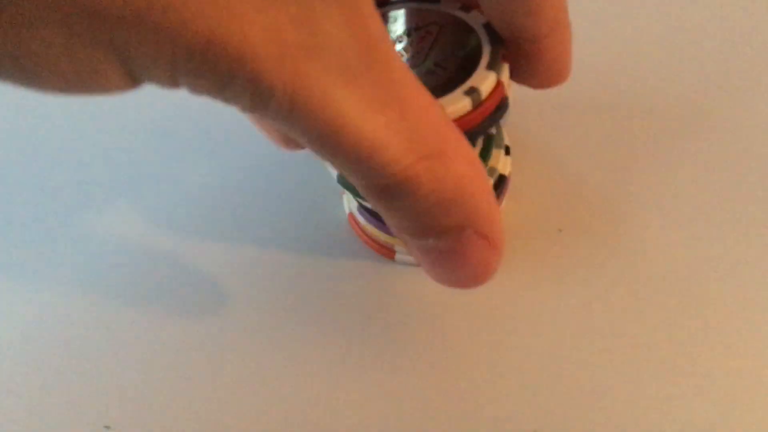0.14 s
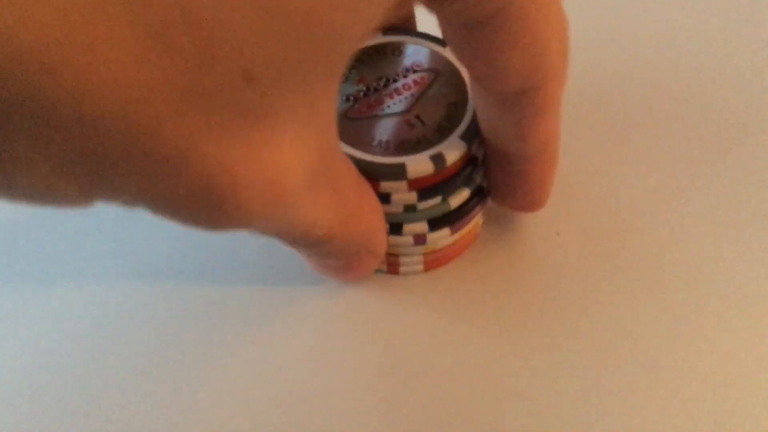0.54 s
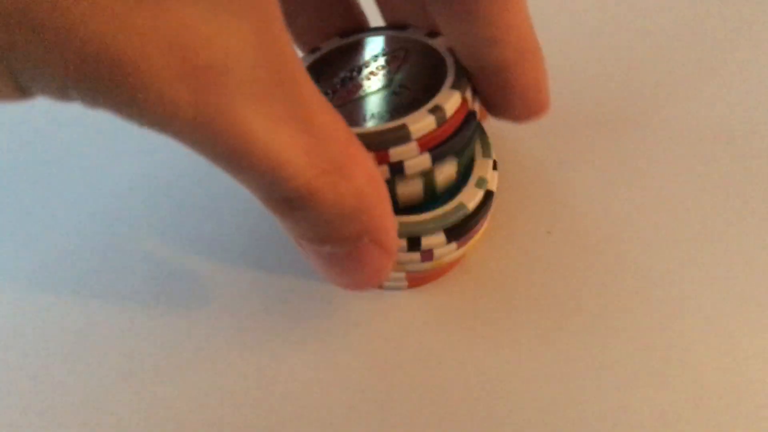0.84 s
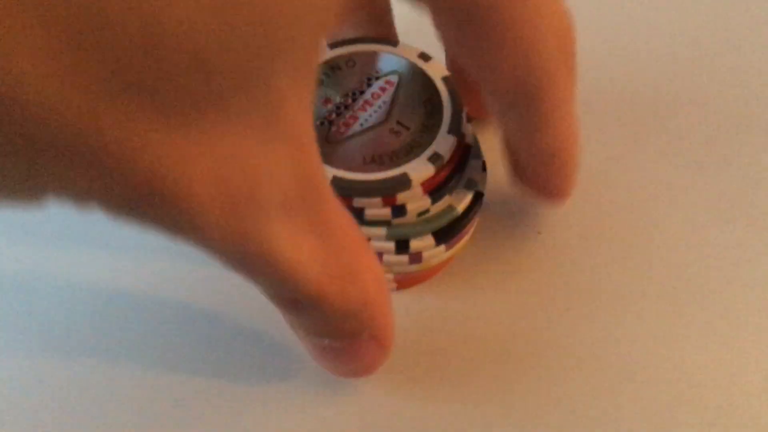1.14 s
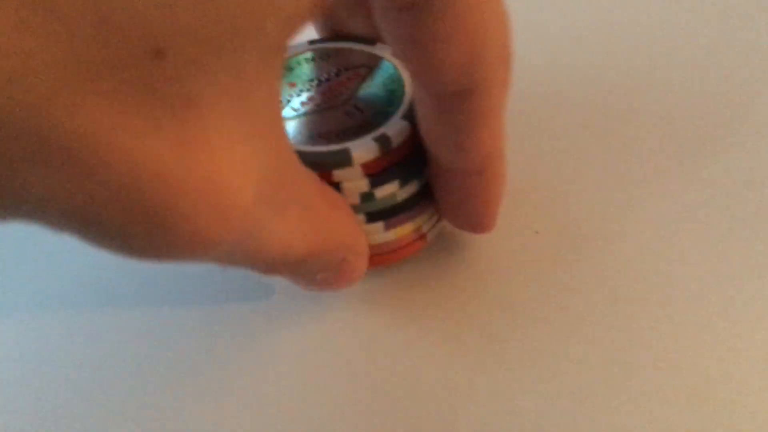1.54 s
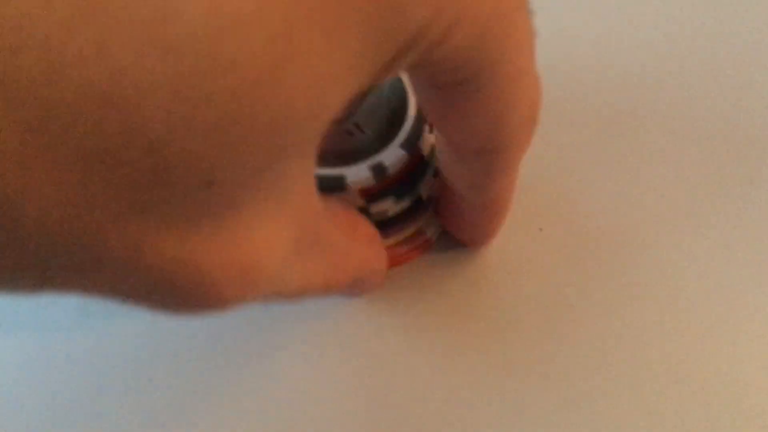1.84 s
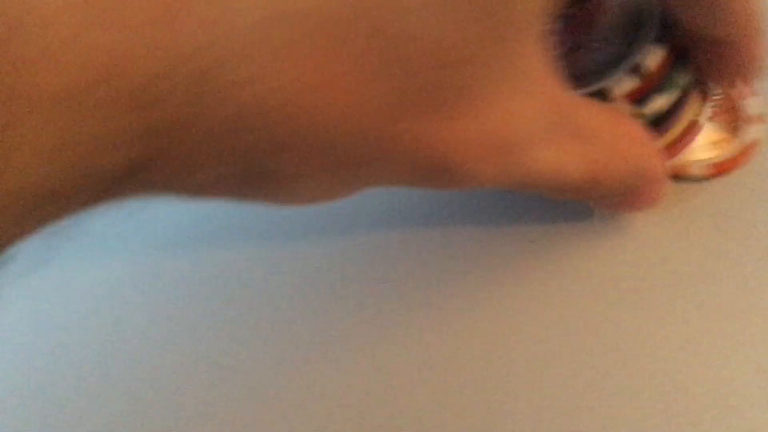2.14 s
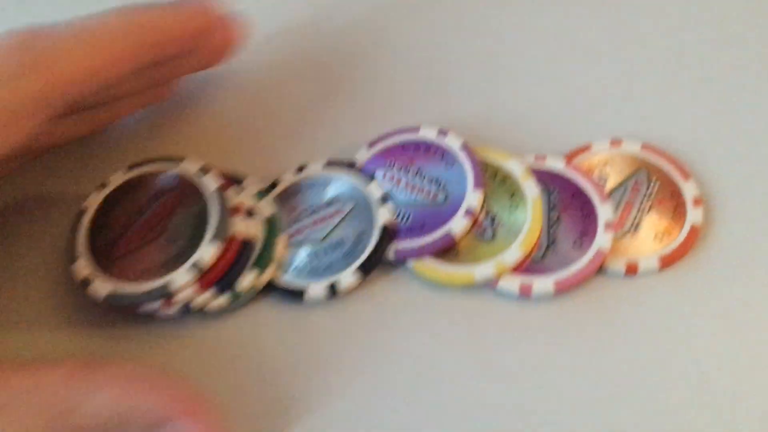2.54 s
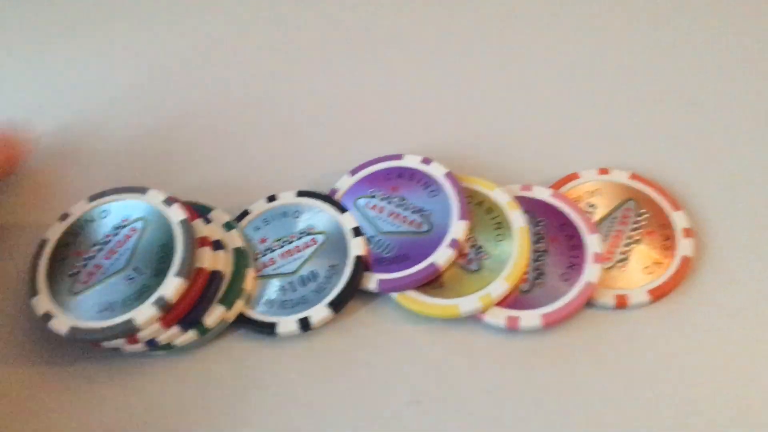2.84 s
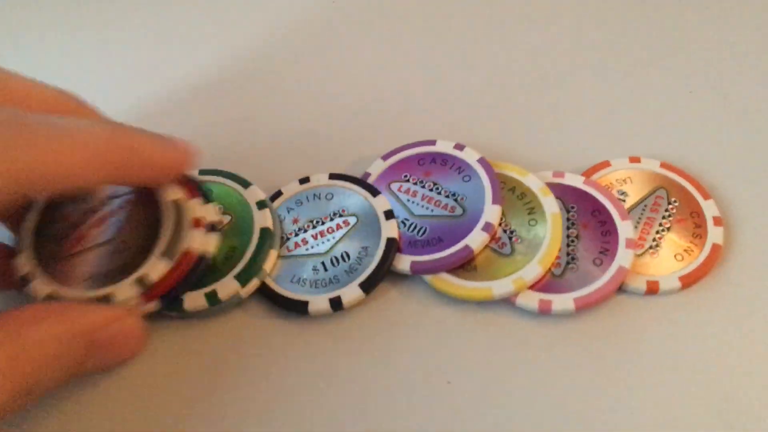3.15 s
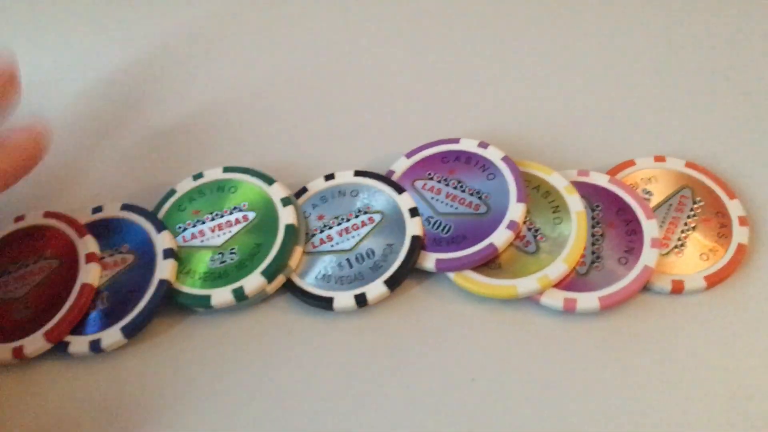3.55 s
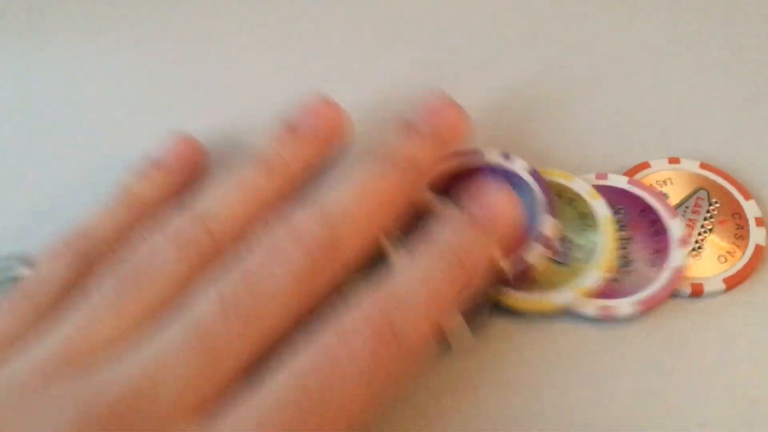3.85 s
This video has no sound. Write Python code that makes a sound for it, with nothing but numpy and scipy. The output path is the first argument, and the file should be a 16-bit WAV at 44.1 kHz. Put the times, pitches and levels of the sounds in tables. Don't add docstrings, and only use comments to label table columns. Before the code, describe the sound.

Stack of poker chips clattering in quick bursts, dropped, spread and slid along a table top

```python
import sys
import numpy as np
from scipy import signal
from scipy.fft import rfft, irfft, next_fast_len
from scipy.io import wavfile
from scipy.ndimage import uniform_filter1d, map_coordinates

SR = 44100
rng = np.random.default_rng(int(sys.argv[2]) if len(sys.argv) > 2 else 0)


def ratio(d):
    e = np.asarray(d, float) / 20
    return 10 ** e


def master_out(mix):
    frames = np.transpose(np.atleast_2d(mix))
    ceiling = np.clip(frames, -1, 1)
    pcm = np.round(ceiling * 32767).astype(np.int16)
    wavfile.write(sys.argv[1], SR, pcm)


N = 176400

# (time [s], crack [dB], high chip ring [dB], low stack ring [dB], table knock [dB])
RIFFLE_1 = [(0.0344, -34, -2, 3, -2), (0.0858, -22.5, -11, 1, 4), (0.1319, -24.5, -5.5, 2, 2),
            (0.1537, -33.5, 6.5, -1.5, -1.5), (0.1753, -18.5, 0, -2, -7), (0.1795, -19, -6, -1.5, -4),
            (0.1893, -18.5, -6.5, -19, -9.5), (0.2, -23.5, 8.5, 5, -3), (0.2268, -30, -3, 4.5, 6),
            (0.2521, -22, 14, -8, -5), (0.2807, -17.5, 0, -6, -5), (0.3094, -17.5, 1.5, -9.5, -9),
            (0.3293, -21, 2, 0.5, 0.5), (0.3508, -23, 9.5, -9, -6), (0.3554, -16, 4, -18, -14),
            (0.3611, -19.5, 6.5, -10, -9.5), (0.3635, -19, 7.5, -15, -10.5)]
RIFFLE_2 = [
    (0.8378, -18.5, -4.5, -1.5, 0),
    (0.8655, -22.5, -17, 8, 0),
    (0.9016, -19.5, -15, 2, -9.5),
    (0.9229, -25.5, -5, 5.5, -2),
    (0.9707, -34, 4, 8.5, 7),
    (1.002, -20, 0, 1.5, -7),
    (1.0696, -22, -2, -4.5, -5.5),
    (1.0994, -25, 0, -4.5, -11),
    (1.1036, -27, -1, -6, -8),
    (1.1324, -23, -3, -7, -9),
]
SPREAD = [
    (1.6804, -19, -0.5, -0.5, 0),
    (1.7435, -27, 3, -1, -3.5),
    (1.8101, -22, -6.5, 1, 0.5),
    (2.2167, -16, -2, -5, 0.5),
    (2.294, -15, -4, -4.5, -2),
    (2.3106, -27.5, 9.5, -0.5, 5.5),
    (2.3156, -27.5, 4.5, -2, 0),
    (2.394, -32, -0.5, -4, 12.5),
    (2.4701, -44.5, 2, 10, 17.5),
    (2.5183, -45, 6, 4, 13),
]
PUSH = [(3.3757, -21, 5, 7.5, -4), (3.3806, -26, 12, 2, 0), (3.3859, -19.5, 4.5, -16.5, -6),
        (3.3895, -16.5, -2, -10.5, -10.5), (3.3945, -18.5, 5.5, -1.5, -8), (3.3973, -16, 6.5, -5.5, -6),
        (3.4007, -17, -2, -6.5, -9), (3.4096, -23.5, 12, -0.5, -1.5), (3.4161, -23, 1, 1, -2),
        (3.607, -20.5, -6.5, -3.5, -10), (3.8011, -36, -3, 6, 0), (3.8579, -41.5, -1, 12.5, 10),
        (3.8742, -40, -2, 8, 6.5)]
# (time [s], level [dB])
TICKS = [(0.0992, -34), (0.1481, -33.5), (0.249, -27), (0.3151, -26.5), (0.8439, -30), (0.912, -30.5),
         (1.0796, -40), (1.8368, -31), (1.8964, -55), (2.166, -40), (2.2223, -23.5), (2.4097, -31.5),
         (3.1595, -54.5), (3.3728, -27.5), (3.4238, -23.5), (3.4525, -30), (3.4638, -31), (3.4747, -34.5),
         (3.6127, -34.5), (3.6271, -33.5), (3.8222, -36), (3.8639, -33)]
# (time [s], level [dB])
STRAYS = [
    (3.583, -46),
    (3.813, -38),
    (3.83, -38),
    (3.839, -40),
    (.883, -34),
    (1.7, -36),
]
# (frequency [Hz], level [dB])
CRACK = [(1500, -12), (4200, 0), (9500, -4.5), (16000, -8)]
# (frequency [Hz], level [dB], T60 [s])
CHIP_MODES = [(4300, -9, .005), (6560, 0, .01), (7000, -2, .009)]
STACK_MODES = [(1764, -4, 0.0072), (2239, 1, .008), (2650, -4, 0.007)]
# (frequency [Hz], level [dB], T60 [s])
TABLE_MODES = [(90.1, -19, 0.2), (164.3, -19.5, 0.36), (255.6, -15.5, .2), (492.8, -13.5, 0.12),
               (805, -5, .08), (1005, -5, 0.06), (1181, -2, .04), (1434, -6, .04)]
# (frequency [Hz], level [dB])
THUD = [(130, -3), (1200, 1.5), (3000, -5), (7000, -16.5), (14000, -25.5)]
# (time [s], level [dB], frequency [Hz], T60 [s])
STANDOUT = [(.087, -19, 1150, .03), (.25, -30, 92, .3), (.335, -27, 92, .3), (.4, -38, 163, .4),
            (.905, -24, 90, .3), (.99, -27, 95, .25), (1.07, -28, 95, .3), (1.5, -54, 140, .6),
            (1.682, -12, 1250, .028), (1.6805, -18, 8900, .008), (1.815, -21, 98, .25),
            (2.218, -15, 1450, .03), (2.296, -20, 1000, .03), (2.315, -24, 1010, .06),
            (1.681, -17, 2000, .015), (3.608, -27, 2300, .03), (1.681, -18, 6300, .008)]
# (time [s], rise [s], fall per 20 dB [s], level [dB], deep modes [dB])
RUBS = [(0, .011, .36, -55, -3), (.47, .04, .2, -57, -3), (1.29, .07, .09, -52, 0),
        (1.885, .012, .05, -42, -12), (2.01, .07, .07, -47, -8), (2.152, .008, .1, -40, -12),
        (2.174, .006, .08, -30, -20), (2.23, .05, .13, -42, 0), (2.41, .03, .2, -42, 0),
        (2.5, .03, .17, -53, 11), (2.6, .07, .025, -55, 4), (3.03, .015, .04, -60, -8),
        (3.16, .03, .7, -55, -5), (3.43, .06, .3, -46, -8), (3.797, .006, .3, -42, -8),
        (3.855, .02, .4, -37, -3)]
# (frequency [Hz], width [Hz], level [dB])
SCRAPE = [(815, 70, 0), (1100, 120, -8), (1290, 90, -6)]
DEEP = [(275, 45, 0), (480, 40, -4), (610, 50, -8)]
# (frequency [Hz], level [dB])
SCRAPE_BED = [(200, -30), (500, -14), (1100, -12), (2500, -20), (4000, -32), (16000, -60)]
# (time [s], rise [s], fall per 20 dB [s], level [dB], fizz [dB])
SLIDES = [
    (1.3, .07, .1, -62, -5),
    (2.152, .01, .1, -44, -6),
    (2.42, .05, .2, -50, -8),
    (3.145, .015, .08, -53, -8),
    (3.22, .1, .3, -55, -6),
    (3.45, .05, .3, -49, -2),
    (3.797, .006, .3, -40, -8),
    (3.855, .02, .2, -40, -8),
    (3.89, .04, .25, -38, -13),
]
# (frequency [Hz], width [Hz], level [dB])
FACES = [(1710, 70, 0), (2140, 120, -10), (2420, 90, -6)]
FIZZ = [(3070, 500, -2), (4400, 400, 0), (5300, 500, -2), (6900, 500, -5), (9300, 500, -11)]
# (frequency [Hz], level [dB])
FACES_BED = [(300, -30), (1500, -12), (3000, -16), (8000, -32), (16000, -46)]
# (frequency [Hz], T60 [s])
ROOM = [(200, .3), (2000, .28), (12000, 0.11)]
# (frequency [Hz], level [dB])
HISS = [(300, 0.5), (1500, -7), (7000, -14.5), (16000, -17)]
# (from [s], to [s], gain [dB])
HISS_DIPS = [
    (0.775, 0.837, -5.5),
    (1.537, 1.683, -6),
    (2.719, 3.3, -4),
]
# (frequency [Hz], level [dB])
DRONE = [(25, 4), (55, -3), (95, 0), (200, -11), (300, -14), (700, -49)]
# (time [s], level [dB])
DRONE_LEVEL = [(.45, -49), (.75, -60), (1.0, -45), (1.27, -58), (1.38, -50), (1.65, -55), (1.9, -46),
               (2.55, -52), (2.75, -57), (3.5, -61), (3.75, -54)]
HUM_LEVEL = [(.5, -75), (.66, -60), (.8, -60), (.85, -70), (1.3, -64), (1.66, -65), (1.75, -75), (2.7, -72),
             (2.8, -65), (3.1, -66), (3.2, -72)]
# (frequency [Hz], gain [dB])
MIC = [(7000, 0), (8000, -3), (9400, 3), (10300, -3), (11500, 1), (14300, -2), (15700, -4), (16200, -28)]


def clacks():
    tick_trim_db, tick_rings_db = -11, (7, 4, -3)
    rows = [*RIFFLE_1, *RIFFLE_2, *SPREAD, *PUSH]
    rows += [(s, db + tick_trim_db, *tick_rings_db) for s, db in TICKS + STRAYS]
    out = np.zeros(N + SR)
    for (s, db, high_db, low_db, knock_db), seed in zip(rows, rng.integers(SR, size=99)):
        chance = np.random.default_rng(seed)
        contacts = rim_contacts(chance)
        chips = signal.fftconvolve(contacts, chip_ring(high_db, low_db, chance))
        knock = table_knock(knock_db, chance)
        start = round(s * SR)
        out[start:][:len(chips)] += ratio(db) * chips
        out[start:][:len(knock)] += ratio(db) * knock
    return out[:N]


def rim_contacts(chance):
    contacts, burst_s, size_db = 9, .00045, 3
    chatter_s, chatter_db = .012, -14
    wait, at, size = chance.exponential(size=(3, contacts))
    burst = np.bincount(((wait + at) * burst_s * SR).astype(int), ratio(size_db * size - 2.5 * at))
    late, size = chance.exponential(size=(2, 2 * contacts))
    touches = ratio(chatter_db + size_db * size - 6 * late)
    chatter = np.bincount((late * chatter_s * SR).astype(int), touches, minlength=SR // 10)
    burst = np.pad(burst / np.linalg.norm(burst), (0, len(chatter) - len(burst)))
    return burst + chatter / np.sqrt(contacts)


def chip_ring(high_db, low_db, chance):
    crack_db, chip_db, stack_db = 15.5, 3.5, 4.5
    crack_t60_s = 0.0046
    t = np.arange(SR // 20) / SR
    crack = coloured(chance.standard_normal(len(t)), CRACK) * ratio(-60 * t / crack_t60_s)
    chip = ratio(chip_db + high_db) * ring(CHIP_MODES, t, chance)
    stack = ratio(stack_db + low_db) * ring(STACK_MODES, t, chance)
    return ratio(crack_db) * crack + chip + stack


def table_knock(knock_db, chance):
    level_db, lag_s = -1.5, .0015
    thud_db, thud_t60_s = 9, 0.072
    t = np.arange(SR // 4) / SR
    thud_fade = ratio(thud_db - 60 * np.sqrt(t / thud_t60_s) / 2)
    thud = coloured(chance.standard_normal(len(t)), THUD) * thud_fade
    onset = 1 - np.exp(-(t / lag_s) ** 2)
    return ratio(level_db + knock_db) * (ring(TABLE_MODES, t, chance) + thud) * onset


def ring(modes, t, chance):
    detune, uneven_db = .025, 3
    hz, db, t60 = np.transpose(modes)[:, :, None]
    z = chance.standard_normal((2, len(modes), 1))
    fade = ratio(db + uneven_db * z[0] - 60 * t / t60)
    return np.sum(fade * np.sin(2 * np.pi * hz * (1 + detune * z[1]) * t), axis=0)


def standout():
    rise_cycles = 1.2
    s, db, hz, t60 = np.transpose(STANDOUT)[:, :, None]
    t = np.maximum(np.arange(N) / SR - s, 0)
    swell = 1 - np.exp(-t * hz / rise_cycles)
    return np.sum(ratio(db - 60 * t / t60) * swell * np.sin(2 * np.pi * hz * t), axis=0)


def slides():
    no_bed = [(99, -99)]
    skin = strokes(RUBS, rubbed(SCRAPE, SCRAPE_BED), rubbed(DEEP, no_bed))
    chips = strokes(SLIDES, rubbed(FACES, FACES_BED), rubbed(FIZZ, no_bed))
    return skin + chips


def strokes(rows, body, extra):
    t = np.arange(N) / SR
    out = np.zeros(N)
    for s, rise, fall, db, extra_db in rows:
        press = np.clip((t - s) / rise, 0, 1) ** 2
        fade = ratio(db - 20 * np.maximum(t - s - rise, 0) / fall)
        out += press * fade * (body + ratio(extra_db) * extra)
    return out


def rubbed(modes, bed):
    def response(f):
        total = ratio(along(bed, f))
        for k, (centre, width, db) in enumerate(modes):
            peak = 1j * f * width / (centre * centre - f * f + 1j * f * width)
            total = total + (-1) ** k * ratio(db) * peak
        return total
    return unit(patchy(filtered(grit(), response))) * ratio(1.8 * wobble(45))


def grit():
    grains_per_s, grain_db = 4000, 2
    hits = rng.random(N) < grains_per_s / SR
    strength = ratio(grain_db * np.minimum(rng.exponential(size=N), 5))
    return rng.standard_normal(N) * (0.35 + hits * strength)


def patchy(x):
    patch_db = 3
    z = signal.stft(x, nperseg=512)[2]
    field = uniform_filter1d(rng.standard_normal(z.shape), size=5, axis=0)
    field = uniform_filter1d(field, size=6, axis=1)
    return signal.istft(z * ratio(patch_db * unit(field)), nperseg=512)[1][:N]


def room(x):
    gap_s = .008
    out, step = np.zeros(N + SR), SR // 4
    for start in range(0, N, step):
        hz, t, z = signal.stft(rng.standard_normal(SR // 2), SR, nperseg=256)
        decay = ratio(-60 * t / along(ROOM, hz)[:, None])
        tail = signal.istft(z * decay, SR, nperseg=256)[1]
        tail = tail * np.clip(np.arange(len(tail)) / (gap_s * SR), 0, 1)
        wet = signal.fftconvolve(x[start:start + step], tail / np.linalg.norm(tail))
        out[start:start + len(wet)] += wet
    return out[:N]


def floor():
    hiss_db, hum_hz, hum_width_hz = -65.5, 311, 12
    dips = sum(curve([(a - .01, 0), (a, db), (b, db), (b + .01, 0)]) for a, b, db in HISS_DIPS)
    hiss = unit(coloured(rng.standard_normal(N), HISS)) * ratio(hiss_db + dips)
    drone = unit(coloured(rng.standard_normal(N), DRONE)) * ratio(3.0 * wobble(5.7))
    hum = unit(filtered(rng.standard_normal(N), lambda f: 1 / (1 + ((f - hum_hz) / hum_width_hz) ** 2)))
    hum = hum * ratio(curve(HUM_LEVEL) + 2.5 * wobble(8))
    return hiss + ratio(curve(DRONE_LEVEL)) * drone + hum


def unit(x):
    return x / np.sqrt(np.mean(x ** 2) + 1e-20)


def along(points, hz):
    f, v = np.transpose(points)
    return np.interp(np.log(hz + 1), np.log(f + 1), v)


def curve(rows):
    return np.interp(np.arange(N) / SR, *np.transpose(rows))


def wobble(rate):
    return map_coordinates(rng.standard_normal(size=1000), [np.arange(N) * rate / SR])


def filtered(x, response):
    m = next_fast_len(len(x) + 8192)
    return irfft(rfft(x, m) * response(np.fft.rfftfreq(m, 1 / SR)), m)[:len(x)]


def coloured(x, spectrum):
    return filtered(x, lambda hz: ratio(along(spectrum, hz)) * (hz > spectrum[0][0] / 2))


def scene():
    room_db = -16.5
    near = clacks() + standout() + slides()
    return (near + ratio(room_db) * room(near) + floor())[None]


def low_pass(x):
    return signal.sosfilt(signal.butter(12, 17000, fs=SR, output="sos"), x)


def record(dry):
    top_hz, low_cut_hz, ceiling = 16900, 60, .8

    def microphone(hz):
        low_cut = (1j * hz / (low_cut_hz + 1j * hz)) ** 2
        return (hz < top_hz) * ratio(along(MIC, hz)) * low_cut
    x = filtered(dry[0], microphone)
    x = x / (1 + np.abs(x / ceiling) ** 4) ** (1 / 4)
    return low_pass(x[None])


dry = scene()
out = record(dry)
master_out(out)
```